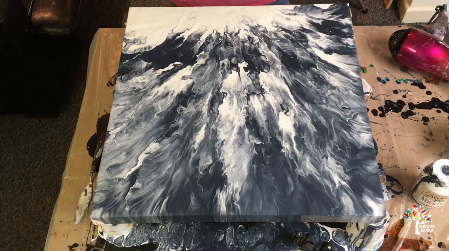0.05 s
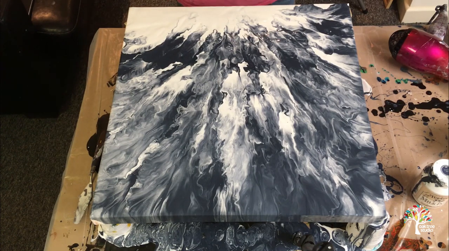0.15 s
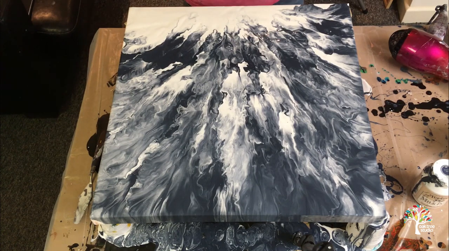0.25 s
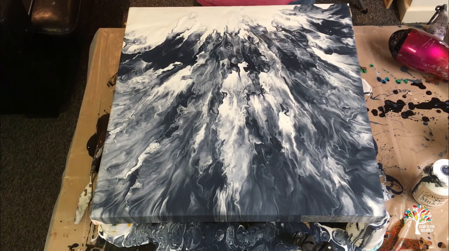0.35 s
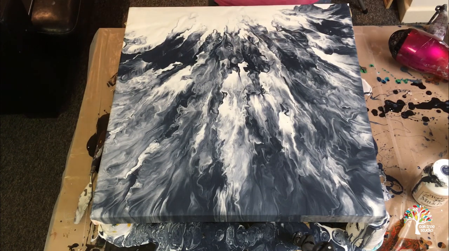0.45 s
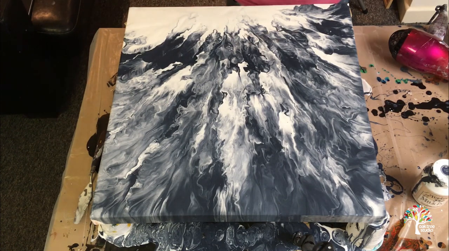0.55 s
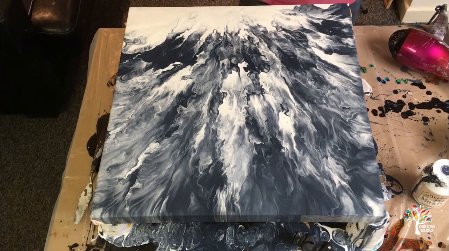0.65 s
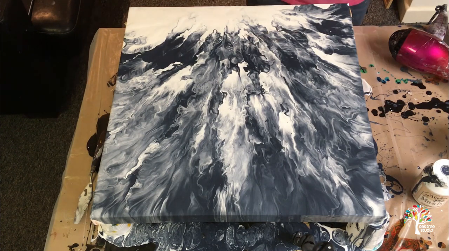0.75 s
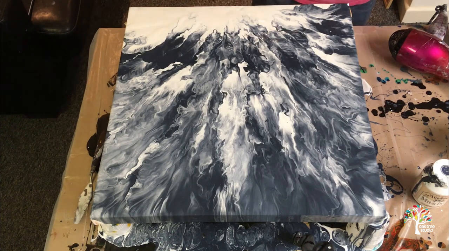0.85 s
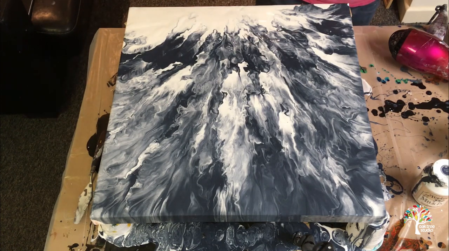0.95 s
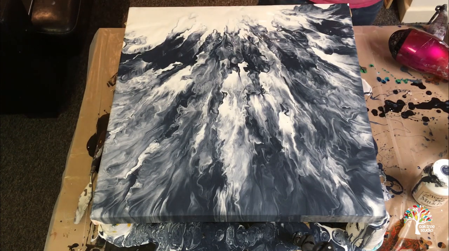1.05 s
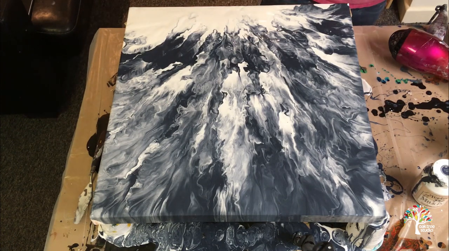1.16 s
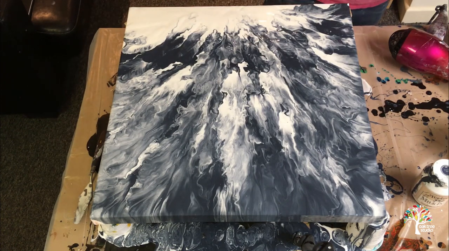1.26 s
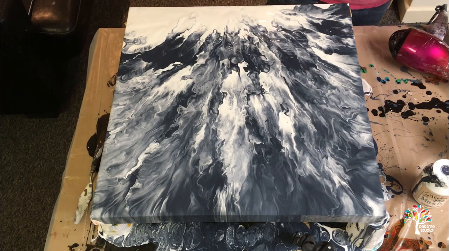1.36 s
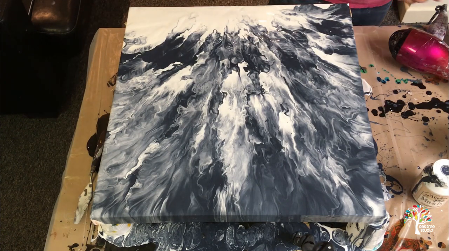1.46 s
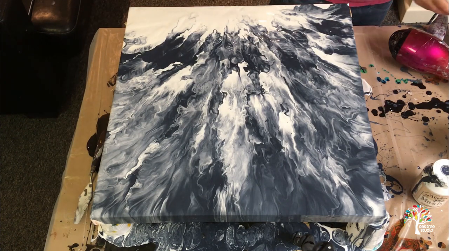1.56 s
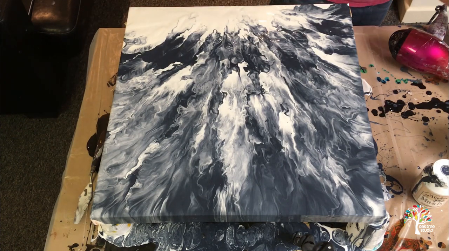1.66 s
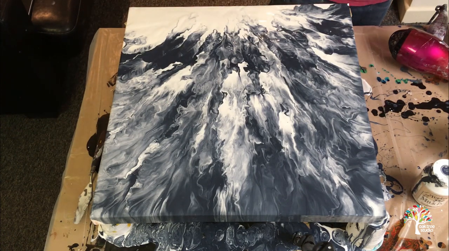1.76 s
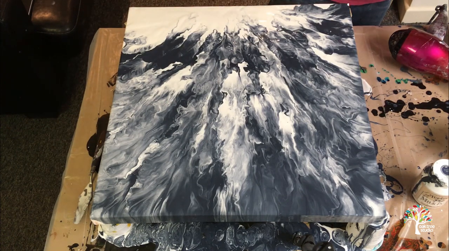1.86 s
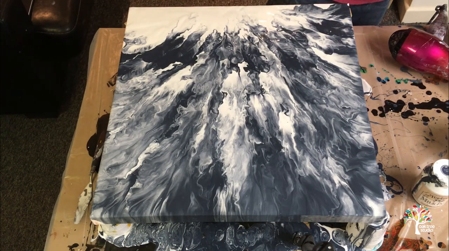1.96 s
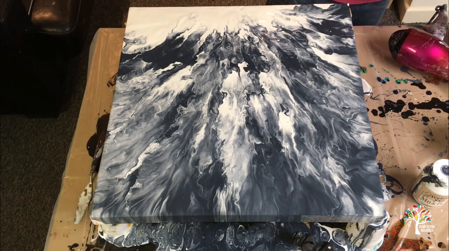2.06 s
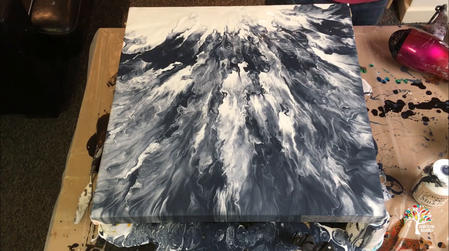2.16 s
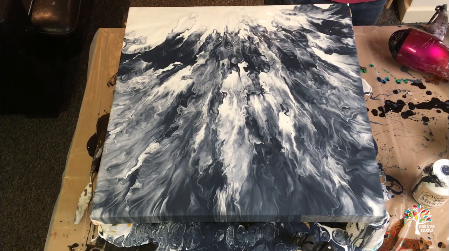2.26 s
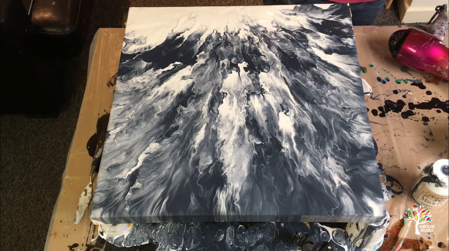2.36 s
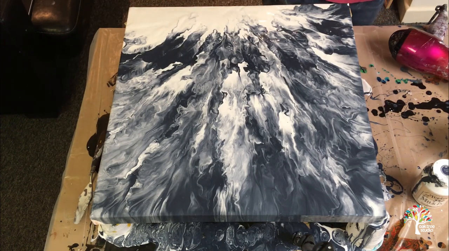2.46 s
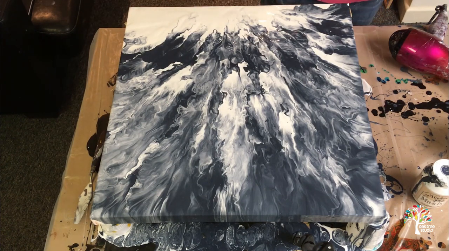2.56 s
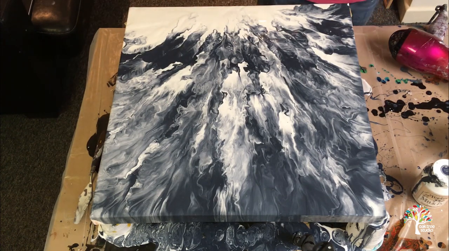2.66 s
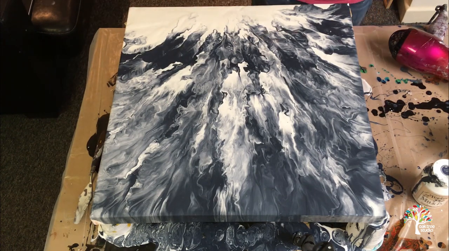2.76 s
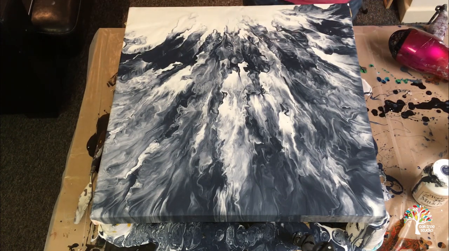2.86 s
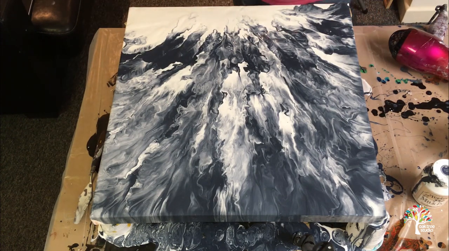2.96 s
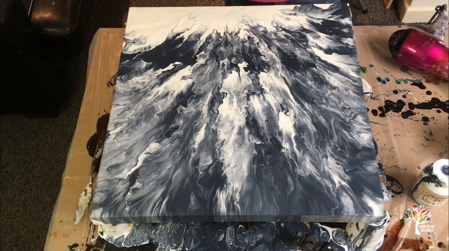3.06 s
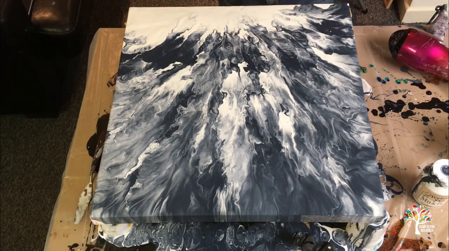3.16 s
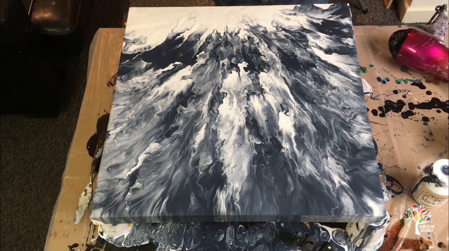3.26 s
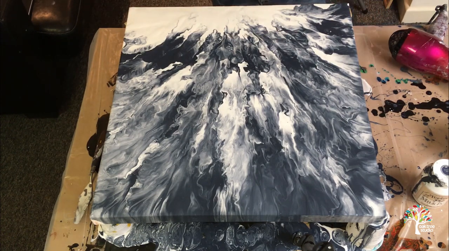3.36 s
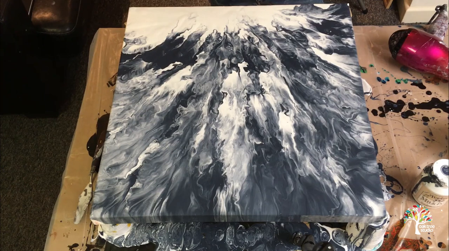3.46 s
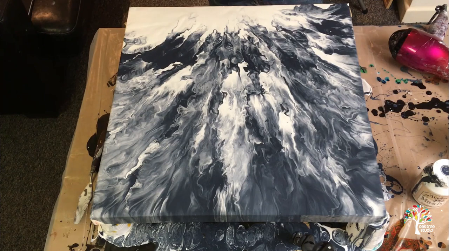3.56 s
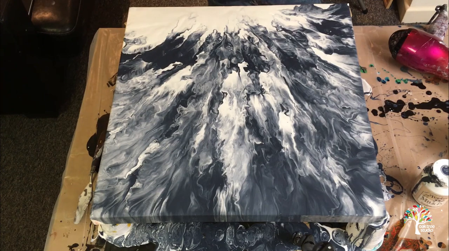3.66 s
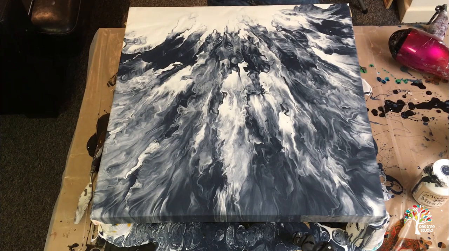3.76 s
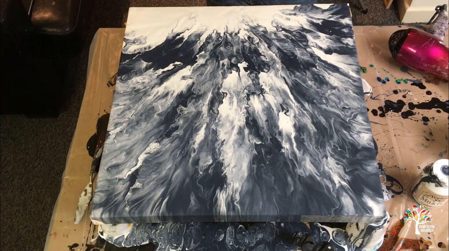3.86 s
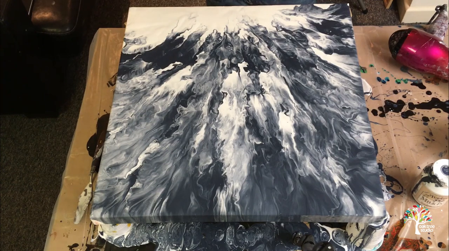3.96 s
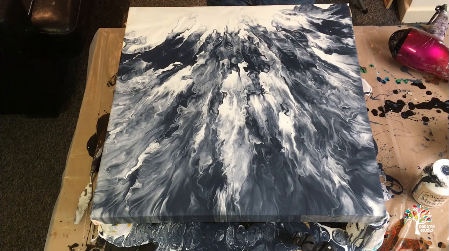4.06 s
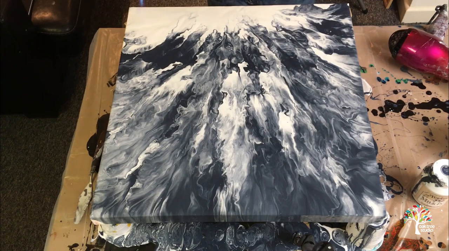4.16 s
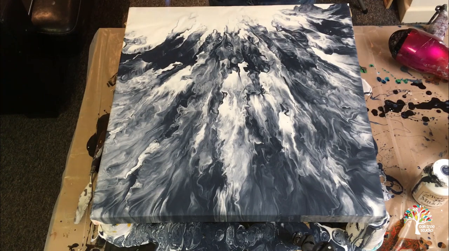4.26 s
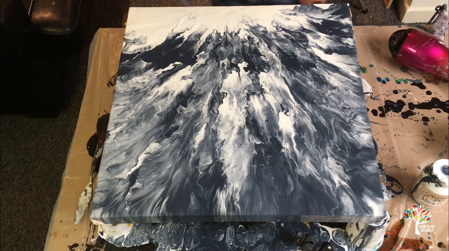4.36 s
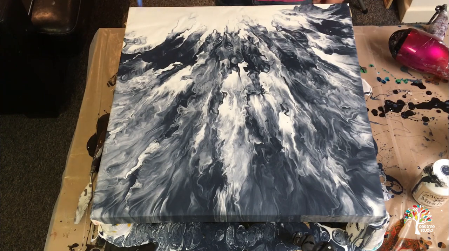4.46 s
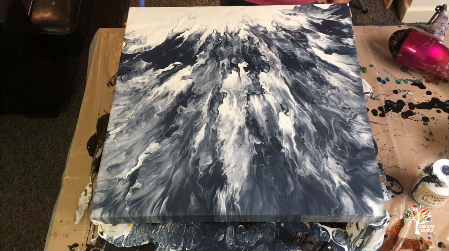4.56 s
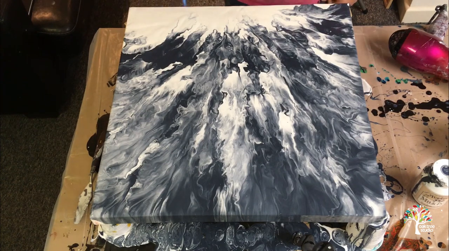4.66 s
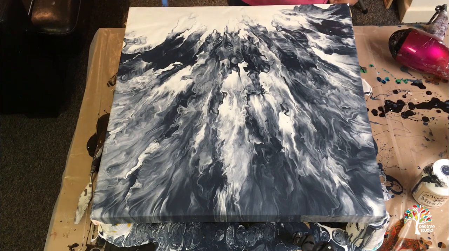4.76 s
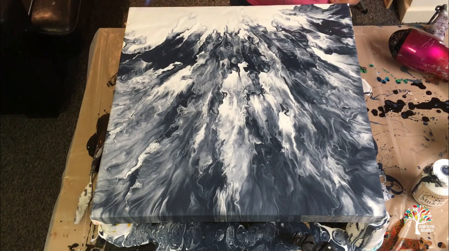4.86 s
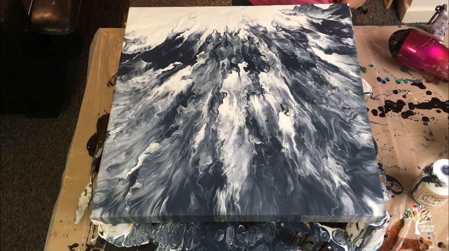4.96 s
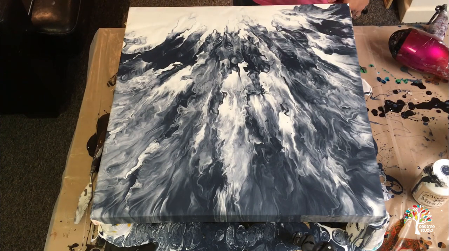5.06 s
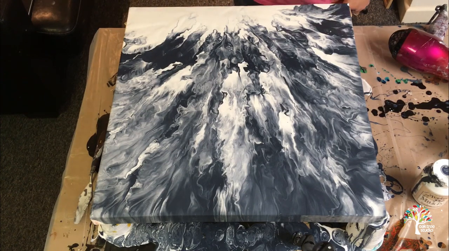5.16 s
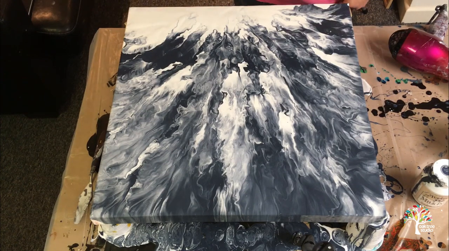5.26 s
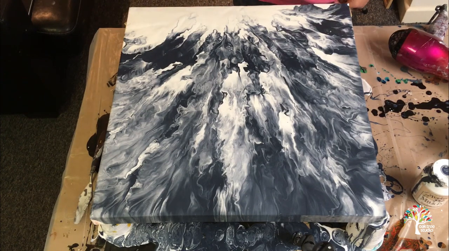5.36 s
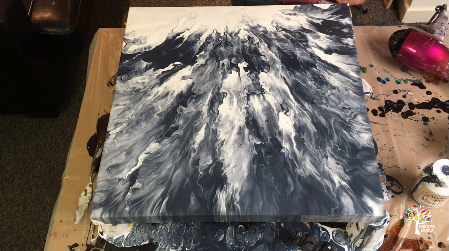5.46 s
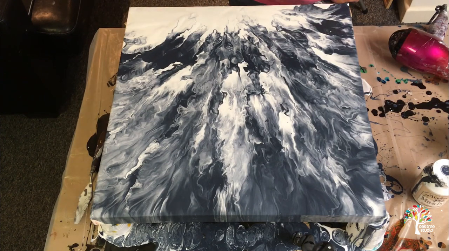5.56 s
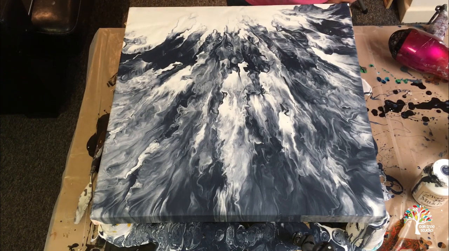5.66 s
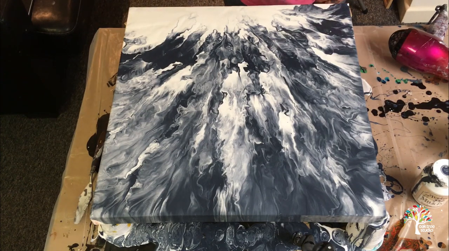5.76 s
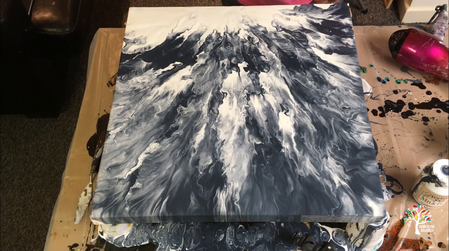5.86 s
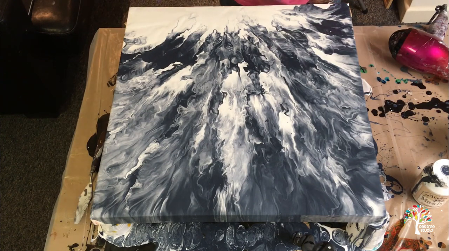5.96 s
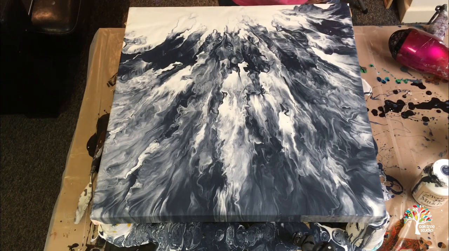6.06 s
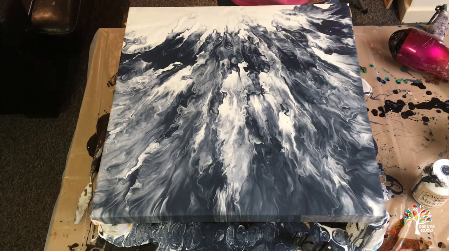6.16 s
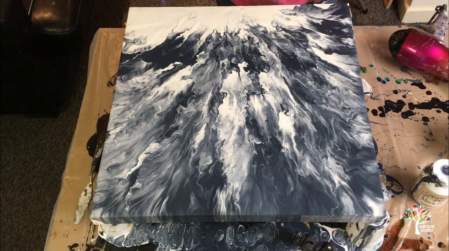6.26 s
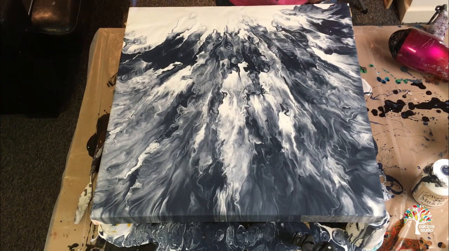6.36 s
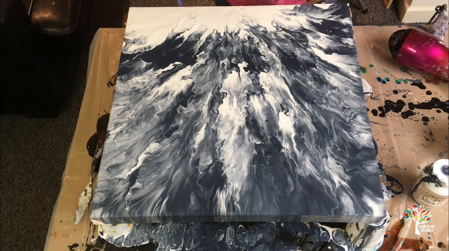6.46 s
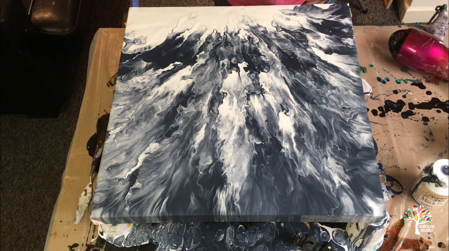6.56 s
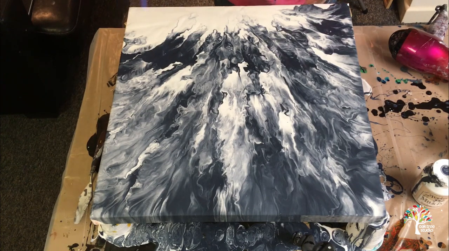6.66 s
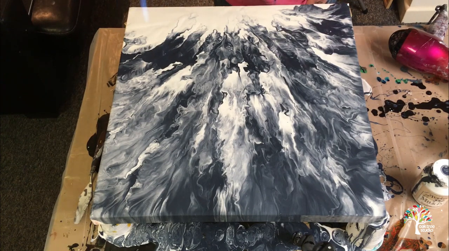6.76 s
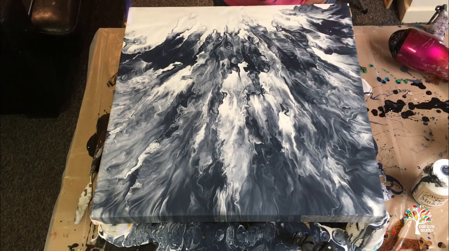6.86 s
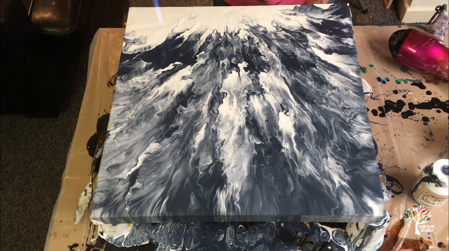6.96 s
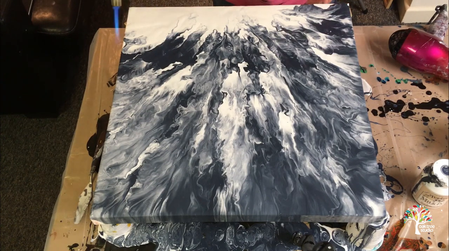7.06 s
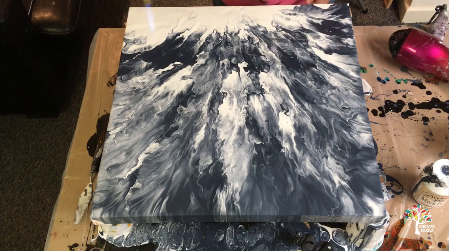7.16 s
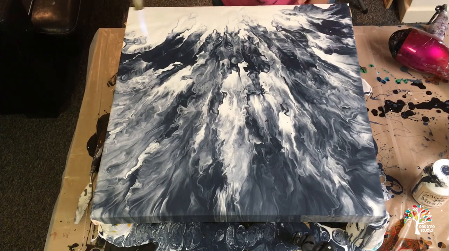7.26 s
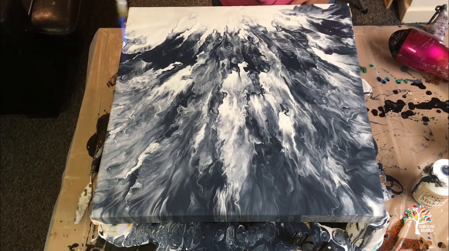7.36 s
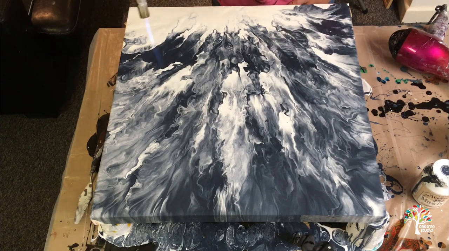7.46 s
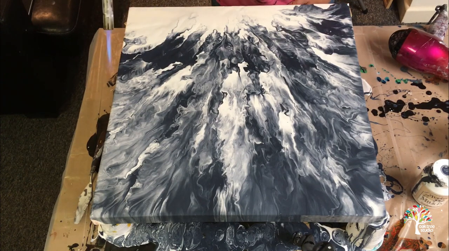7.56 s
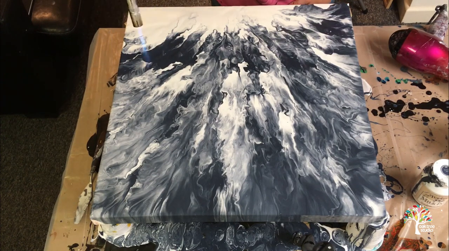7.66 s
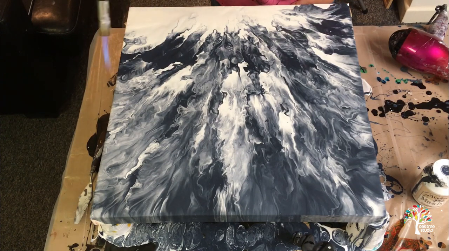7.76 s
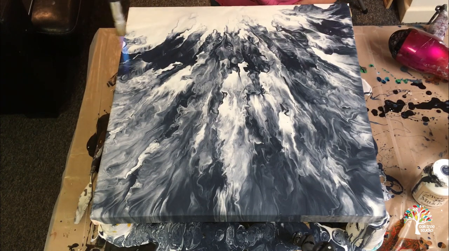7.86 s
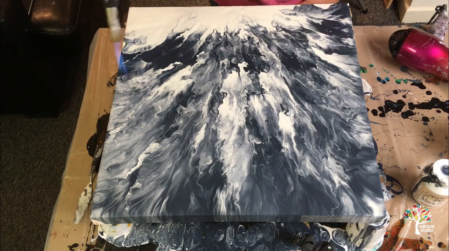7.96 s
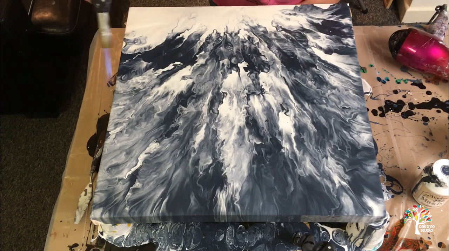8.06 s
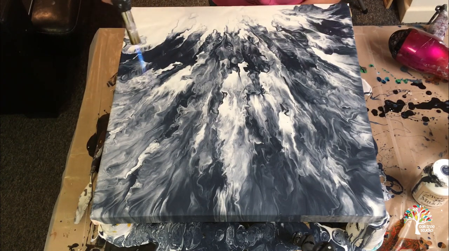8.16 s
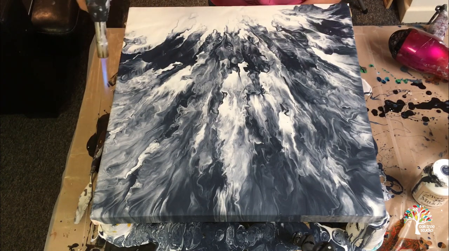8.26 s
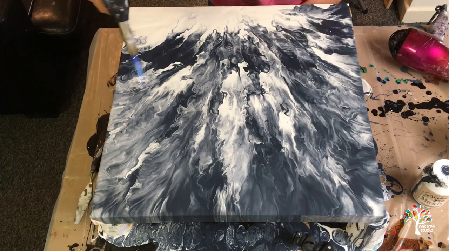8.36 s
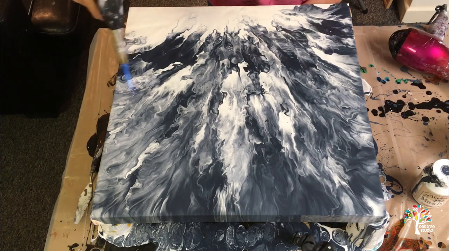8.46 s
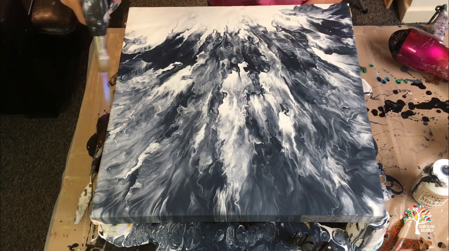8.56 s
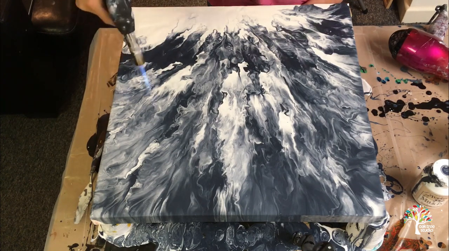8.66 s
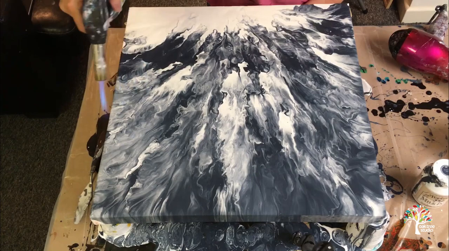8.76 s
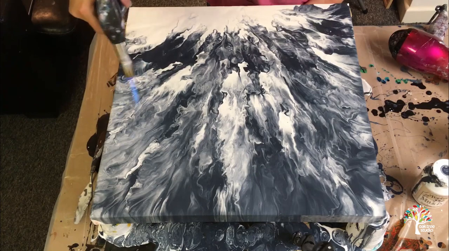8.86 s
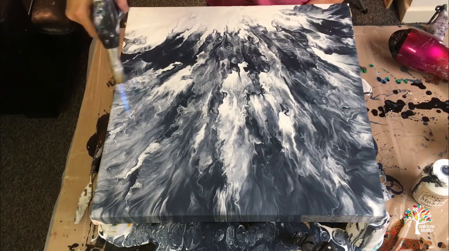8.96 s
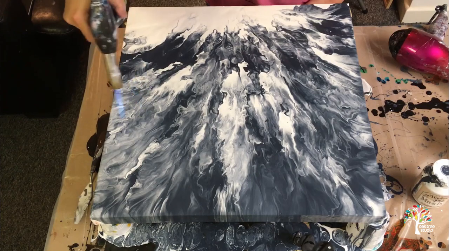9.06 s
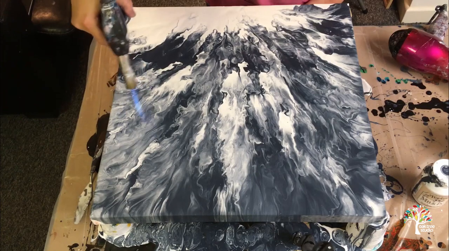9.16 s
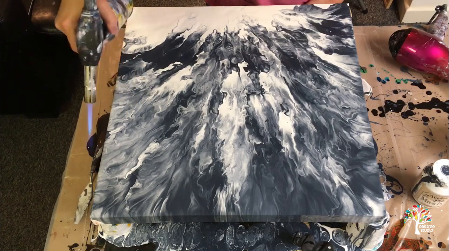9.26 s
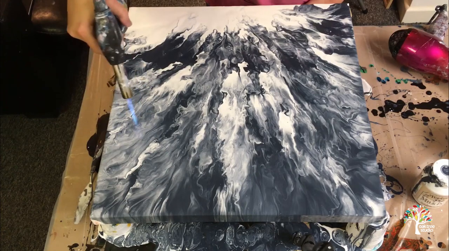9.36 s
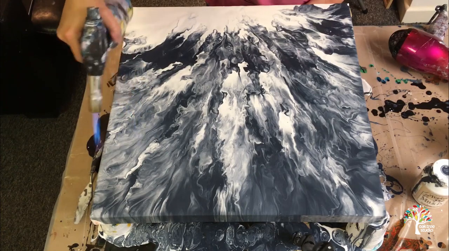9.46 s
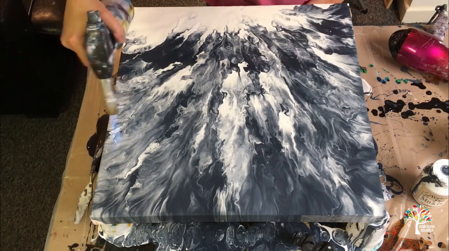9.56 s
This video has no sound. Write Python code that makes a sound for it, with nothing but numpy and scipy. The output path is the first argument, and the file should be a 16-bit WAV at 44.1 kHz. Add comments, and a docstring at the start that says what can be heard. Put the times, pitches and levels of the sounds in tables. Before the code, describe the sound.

A low ventilation hum fills a small room while a hand makes faint clicks, knocks and rubs on a butane torch. The valve opens with a thin hiss, the igniter snaps sharply and the gas catches with a low pop. The flame then roars under a high hiss, flaring several times a second, and grows boomier and duller as it comes nearer the microphone.

```python
"""Butane torch over a table

A ventilation hum fills a small room while a hand clicks, knocks and slides on the torch.
The valve opens with a thin nozzle hiss, the igniter snaps and the gas catches with a low pop.
The turbulent flame roars under the hiss of its jet and flares several times a second as it is
waved about. It turns boomier and duller as it comes nearer over the table."""
import sys
import numpy as np
from scipy import signal
from scipy.fft import rfft, irfft, next_fast_len
from scipy.io import wavfile

SR = 44100
rng = np.random.default_rng(int(sys.argv[2]) if len(sys.argv) > 2 else 0)


def unload_wav(signal):
    """Save mono or channel-first audio to the path in sys.argv[1] as 16-bit WAV at rate SR, clipped to [-1, 1]."""
    wavfile.write(
        sys.argv[1],
        SR,
        np.round(np.clip(np.atleast_2d(signal).T, -1, 1) * 32767).astype(np.int16),
    )


N = 424683
TIME = np.arange(N) / SR
CATCH_S, CATCH_RISE_S = 4.076, 0.01  # the flame takes over from the cold hiss
NEAR_S, APPROACH_S = 5.5, 2.2  # the torch is brought nearer over the table


def amp(db):
    """Decibels to gain."""
    return 10 ** (np.asarray(db) / 20)


def unit(x):
    """Scales to rms 1."""
    return x / np.sqrt(np.mean(x ** 2) + 1e-20)


def add(mix, s, sound):
    """Mixes a sound in at time s."""
    part = mix[max(round(s * SR), 0):][:len(sound)]
    part += sound[:len(part)]


def ramp(start, length):
    """Linear fade from 0 to 1 that stays up."""
    return np.clip((TIME - start) / length, 0, 1)


def decay(t, t60):
    """Falls by 60 dB in t60."""
    return np.exp(-np.log(1000) * np.maximum(t, 0) / t60)


def burst(t, length, rise, t60):
    """Attack, hold until length, release."""
    return (1 - decay(t, rise)) * decay(t - length, t60)


def drift(rate_hz):
    """Random modulator of rms 1, moving at up to the given rate."""
    spectrum = rfft(rng.standard_normal(N // 32))
    hz = np.arange(len(spectrum)) * SR / N
    slow = irfft(spectrum / (1 + (hz / rate_hz) ** 4))
    return unit(np.interp(np.linspace(0, 1, N), np.linspace(0, 1, len(slow)), slow))


def along(points, hz):
    """Reads a table on a log-frequency axis."""
    f, value = np.transpose(points)
    return np.interp(np.log(hz + 1), np.log(f + 1), value)


def resonances(peaks, hz):
    """Summed dB of bell-shaped peaks and dips."""
    return sum(db / (1 + (2 * (hz - centre) / width) ** 2) for centre, width, db in peaks)


def noise(colour, peaks=(), size=N, tilt=0, grains_per_s=SR):
    """Noise of rms 1 with an EQ curve, peaks and a tilt in dB/octave; few grains make it crackle."""
    full = next_fast_len(size)
    hz = np.fft.rfftfreq(full, 1 / SR)
    db = along(colour, hz) + tilt * np.log2(hz + 1) + resonances(peaks, hz)
    grains = rng.standard_normal(full) * (rng.random(full) < grains_per_s / SR)
    return unit(irfft(rfft(grains) * amp(db), full)[:size])


def band(centre_hz, width_hz):
    """Noise of rms 1 ringing in one resonance, steady or gliding."""
    size = next_fast_len(N)
    hz = np.fft.fftfreq(size, 1 / SR)
    white = rng.standard_normal(2 * size).view(complex)
    fuzz = np.fft.ifft(white / (1 + (2 * hz / width_hz) ** 2))[:N]
    phase = 2 * np.pi * np.cumsum(centre_hz * np.ones(N)) / SR
    return unit(fuzz.real * np.cos(phase) - fuzz.imag * np.sin(phase))


# Reverb time of the small room (f/Hz, t60/s)
ROOM_DECAY = [(200, 0.41), (1300, 0.26), (3500, 0.38), (9000, 0.29), (16000, 0.42)]
def room(x, wet_db):
    """Direct sound plus a short tail of sparse reflections; the power is kept."""
    size, taps_per_s, predelay_s = SR // 2, 3000, .003
    taps = rng.choice([-1, 1], size) * (rng.random(size) < taps_per_s / SR)
    hz, t, spectra = signal.stft(taps * (TIME[:size] > predelay_s), SR, nperseg=256)
    fade = 1000. ** (-t / along(ROOM_DECAY, hz)[:, None])
    tail = signal.istft(spectra * fade, SR, nperseg=256)[1]
    wet = signal.fftconvolve(x, tail / np.linalg.norm(tail))[:N]
    return (x + amp(wet_db) * wet) / np.hypot(1, amp(wet_db))


def moving_room(x, wet_db, cycle_s=2.3):
    """Three reverbs crossfade: the reflections change as the torch is waved about."""
    phases = 2 * np.pi * (TIME / cycle_s + np.arange(3)[:, None] / 3)
    return sum(room(x, wet_db) * (1 + np.cos(phase)) / 3 for phase in phases)


def near_echoes(x, count=4, sway_ms=.22):
    """Reflections off nearby things slide as the hand moves and make the hiss shimmer."""
    lags_ms = [lag + sway_ms * drift(rate_hz=1.5) for lag in rng.uniform(1.2, 6, count)]
    late = sum(np.interp(TIME - lag / 1000, TIME, x) for lag in lags_ms) / np.sqrt(count)
    return np.std(x) * unit(x + amp(-3) * late)


# EQ of the room tone (f/Hz, level/dB)
RUMBLE_EQ = [(24, -42), (37, -8), (60, 1.5), (90, -1.5), (115, 6), (165, 1), (185, -5), (240, -10.5),
             (420, -20.5), (1000, -26.5), (2200, -36.5), (5000, -40.5), (12000, -39.5), (16000, -38)]
# Fan tones (f/Hz, level/dB, wander/Hz)
FAN_TONES = [(99.9, -55.5, 0.87), (119.5, -58, 2.345), (160.3, -59, 2.7), (191, -67.5, 3.26)]
def ventilation():
    """A bed of low rumble with a few wandering fan tones."""
    unsteady = amp(.6 * drift(rate_hz=9))
    out = amp(-50) * noise(RUMBLE_EQ) * unsteady
    for hz, db, wander in FAN_TONES:
        pitch = hz + wander * drift(rate_hz=5.5)
        out += amp(db) * np.sqrt(2) * np.sin(2 * np.pi * np.cumsum(pitch) / SR)
    return out


# EQ of skin on the torch (f/Hz, level/dB)
SLIDE_EQ = [(500, -22), (1500, -5), (2000, -6), (2600, 1.5), (3300, -6), (5000, -5.5), (6100, 1.5),
            (7300, -7.5), (10000, -1.5), (12500, -0.5), (15000, -4.5)]
# The torch slips in the hand (t/s, length/s, relative level/dB, tilt/dB per octave)
SLIDE_CUES = [(0, 0.17, -60.5, -1.5), (1.074, 0.057, -59, 2), (1.104, .02, -55, 7), (1.358, 0.27, -70, -5),
              (2.013, 0.12, -65, 3), (2.48, 0.0092, -44, 9), (2.5, .025, -61, 3), (2.552, .03, -55.5, 5.5),
              (2.613, 0.027, -59.5, 3)]
def slides():
    """Skin rubs unevenly along the torch."""
    out, t = np.zeros(N), TIME[:SR // 2]
    for s, length, db, brightness in SLIDE_CUES:
        rub = noise(SLIDE_EQ, size=len(t), tilt=brightness)
        add(out, s, amp(db) * rub * burst(t, length, rise=0.008, t60=0.12))
    return out * amp(2.5 * drift(rate_hz=87))


# Ring of the torch body, also struck by the igniter (f/Hz, width/Hz, level/dB)
BODY_MODES = [(1660, 220, 11), (3380, 450, 12), (4340, 200, 4), (6180, 120, 15), (6800, 170, 10.5),
              (9800, 430, 5), (14700, 500, -4)]
def contacts(cues, octaves, rise, t60, ring_share):
    """Each touch is a noise burst around its centre frequency, coloured by the torch body."""
    out, t = np.zeros(N), TIME[:SR // 4]
    hz = np.geomspace(40, 20000, 400)
    ring = [(f, width, ring_share * db) for f, width, db in BODY_MODES]
    for s, db, centre in cues:
        bell_db = -15 * np.log1p((np.log2(hz / centre) / octaves) ** 2 / 2)
        hit = noise(np.column_stack([hz, bell_db]), ring, size=len(t))
        add(out, s, amp(db) * hit * burst(t, 0, rise, t60))
    return out


# Hard clicks of trigger and valve (t/s, level/dB, f/Hz)
CLICK_CUES = [(.234, -50, 3500), (1.109, -40, 4500), (1.168, -45, 12000), (2.011, -51, 12000),
              (2.039, -52, 14000), (2.079, -40.5, 11000), (2.095, -53, 3500), (2.482, -40, 16000),
              (2.706, -46, 14000), (3.202, -33, 3580), (3.791, -27, 7000)]
# Pitched tinks of small parts (t/s, level/dB, f/Hz)
TINK_CUES = [(.234, -57, 3250), (1.109, -48, 2500), (1.112, -51, 3440), (1.353, -64, 3150),
             (2.08, -56, 1500), (2.485, -60, 2500), (2.5, -59, 3450), (2.666, -51, 1220),
             (2.699, -65, 1270), (3.791, -48, 1140)]
# Soft knocks of the hand (t/s, relative level/dB, f/Hz)
KNOCK_CUES = [(.385, -59, 800), (.429, -47.5, 1010), (.44, -50.5, 1350), (.445, -48.5, 2200),
              (.615, -62, 1500), (.877, -64, 1100), (1.109, -50, 480), (1.354, -64, 1900),
              (1.392, -59, 1100), (1.587, -58, 1200), (1.71, -59, 960), (1.849, -53, 288),
              (2.285, -62, 1000), (2.325, -56.5, 750), (2.537, -54.5, 930)]
def handling():
    """Hand foley: hard parts hit fast and bright, skin lands slow and dull."""
    clicks = contacts(CLICK_CUES, octaves=3.4, rise=0.001, t60=0.013, ring_share=0.15)
    tinks = contacts(TINK_CUES, octaves=.085, rise=0.001, t60=.06, ring_share=.1)
    knocks = contacts(KNOCK_CUES, octaves=0.69, rise=0.024, t60=0.092, ring_share=0.065)
    hard = room(clicks, wet_db=-0.5) + room(tinks, wet_db=-2)
    return hard + amp(1) * room(amp(3.5) * knocks + slides(), wet_db=-0.5)


def whistles(peaks, swell_db, rate_hz, bend_share=.005):
    """Each resonance swells and fades by itself; all bend together with the gas flow."""
    bend = 1 + bend_share * drift(rate_hz)
    voices = (amp(db + swell_db * drift(rate_hz)) * band(hz * bend, width) for hz, width, db in peaks)
    return unit(sum(voices))


# Pitch curve of the nozzle's top whistle (t/s, f/Hz)
WHISTLE_GLIDE = [(3.42, 14750), (3.54, 13950), (3.76, 13850), (4.03, 14400)]
def sliding_whistles(width_hz=650):
    """A breathy whistle sags as the valve opens, then climbs; a lower one joins at full flow."""
    hz = np.interp(TIME, *np.transpose(WHISTLE_GLIDE))
    lower = amp(-7) * ramp(start=3.88, length=.1) * band(.853 * hz, width_hz)
    return amp(-7.5) * band(hz, width_hz) + lower


# EQ of the unlit gas (f/Hz, level/dB)
GAS_EQ = [(500, -36), (1100, -2.5), (1600, -7.5), (2300, -9.5), (3500, -0.5), (4500, -7), (5000, -20),
          (6000, 5), (7600, -3.5), (9600, 5.5), (10400, 1), (11400, 6.5), (13000, -2), (15700, 7.5)]
# Nozzle resonances (f/Hz, width/Hz, level/dB)
NOZZLE_MODES = [(2770, 390, -8), (4500, 420, -8), (5780, 450, -1), (6460, 600, -0.5), (8770, 900, -2.5),
                (13900, 1100, -1)]
def cold_gas():
    """Gas hisses and whistles faintly through the nozzle from the valve opening until it catches."""
    hiss = amp(-1) * noise(GAS_EQ)
    whistle = amp(-7) * whistles(NOZZLE_MODES, swell_db=2.5, rate_hz=3.5) + sliding_whistles()
    flow = ramp(start=3.265, length=0.14) * (1 - ramp(CATCH_S, CATCH_RISE_S))
    return room(near_echoes(amp(-47.5) * flow * (hiss + whistle)), wet_db=-14.5)


# EQ of the sharp snap (f/Hz, level/dB)
SNAP_EQ = [(200, -55), (1500, -7.5), (4000, -3), (7000, -3), (10000, 6.5), (15000, 1), (16500, -22)]
# EQ of the ringing clack after it (f/Hz, level/dB)
CLACK_EQ = [(40, 6), (150, -2), (330, -22), (900, -2), (2400, -5), (4500, -1.5), (8000, -1), (14000, 1),
            (15700, -2), (16500, -16)]
def igniter(pop_hz=95):
    """The striker snaps and rebounds, the body rings on, and the gas catches with a low pop."""
    out, t = np.zeros(N), TIME[:SR // 2]
    snap = np.tanh(.5 * noise(SNAP_EQ, size=SR // 500))
    add(out, 4.0459, amp(-3.5) * (snap - snap.mean()))
    ring_out = amp(-19) * decay(t, t60=.18) + amp(-42) * decay(t, t60=.02)
    add(out, 4.0757, noise(CLACK_EQ, BODY_MODES, size=len(t)) * ring_out)
    rebound = noise(CLACK_EQ, BODY_MODES, size=len(t)) * decay(t, t60=0.03)
    add(out, 4.0815, amp(-28) * rebound)
    swell = t / 0.0051
    pop = swell * np.exp(1 - swell) * np.sin(2 * np.pi * pop_hz * t)
    add(out, 4.079, amp(-24.5) * pop)
    return signal.sosfilt(signal.butter(3, 65, "high", fs=SR, output="sos"), out)


def freshness(settle_s):
    """1 when the gas catches, easing to 0 as the flame settles."""
    return np.exp(-np.maximum(TIME - CATCH_S, 0) / settle_s)


# EQ of the burning jet (f/Hz, level/dB)
JET_EQ = [(1000, -22), (3000, 5), (4300, -0.5), (4900, 0.5), (5300, 3.5), (7300, -1), (9800, -1),
          (10400, 6), (11200, 4.5), (13400, -21), (15700, 1)]
# Burner tube resonances (f/Hz, width/Hz, level/dB)
BURNER_MODES = [(5900, 420, -2), (8590, 1000, 3.5), (9630, 530, -0.5), (12400, 1700, 4.5),
                (14400, 800, 5.5)]
def jet(duck):
    """The jet hisses harder while the flame is fresh; the tube's whistle grows as it comes nearer."""
    near = ramp(NEAR_S, APPROACH_S)
    whistle = amp(-52.5 + 1.5 * near) * whistles(BURNER_MODES, swell_db=2.1, rate_hz=4.4)
    hiss = amp(-55 + 5.5 * freshness(settle_s=0.85)) * noise(JET_EQ)
    return hiss + whistle * duck ** 0.68


# EQ of the steady combustion (f/Hz, level/dB)
ROAR_EQ = [(40, -53), (90, 6), (170, 7), (215, 2.5), (300, 0.5), (550, 1), (900, 1.5), (1150, -0.5),
           (1600, -7.5), (2200, -11.5), (3300, -16.5), (4500, -24.5), (8000, -46), (16000, -47)]
# Room resonances near the flame, also heard in the flares (f/Hz, width/Hz, level/dB)
ROOM_MODES = [(159, 5.6, 1), (332, 13, 3), (410, 12, 4), (461, 13, 4.5), (655, 28, 2.5)]
def roar():
    """Turbulent combustion: hollow when fresh, booming over the table."""
    hollow = amp(-43.5) * freshness(settle_s=0.88) * band(centre_hz=591, width_hz=320)
    boom = amp(-50) * ramp(NEAR_S, length=.2) * band(centre_hz=150.2, width_hz=106)
    steady = amp(-39.5 - 0.2 * freshness(settle_s=0.85)) * noise(ROAR_EQ, ROOM_MODES)
    return steady + hollow + boom


# EQ of a flare (f/Hz, level/dB)
FLARE_EQ = [(60, -62), (150, 9), (300, 0.5), (550, 3.5), (950, 4), (1600, -5.5), (2200, -8.5), (3400, -11),
            (4500, -14), (7000, -18.5), (10000, -17.5), (15700, -22.5)]
# The flame tears in the moving air (t/s, length/s, relative level/dB)
FLARE_CUES = [(4.39, 0.056, -40.5), (4.554, 0.092, -35), (4.715, .06, -43.5), (4.878, 0.04, -36),
              (4.941, 0.054, -35), (5.113, 0.05, -36), (5.255, 0.066, -35.5), (5.436, 0.047, -36),
              (5.483, 0.058, -36), (5.621, 0.049, -34.5), (5.786, 0.042, -37.5), (5.923, 0.036, -39),
              (6.063, 0.034, -41), (6.165, 0.031, -34.5), (6.386, 0.051, -34.5), (6.529, 0.057, -36),
              (6.626, 0.065, -33), (6.747, 0.076, -42.5), (6.863, .06, -35), (6.998, 0.041, -38),
              (7.102, 0.065, -37), (7.271, 0.028, -40), (7.388, 0.023, -37), (7.489, 0.043, -36),
              (7.613, 0.049, -40), (7.717, 0.048, -37.5), (7.95, 0.039, -38), (8.071, 0.034, -34.5),
              (8.205, 0.053, -43), (8.346, 0.029, -38.5), (8.467, 0.047, -39.5), (8.594, 0.04, -34.5),
              (8.704, 0.072, -39), (8.839, 0.038, -37.5), (9.09, 0.027, -39.5), (9.188, 0.057, -36.5),
              (9.33, 0.022, -33.5), (9.442, 0.043, -40.5), (9.551, 0.027, -34)]
# The flame spits sharply (t/s, relative level/dB)
SPIT_CUES = [(5.924, -27), (8.347, -23.5), (8.473, -29), (8.598, -25)]
def flares(typical_db=-37):
    """Gusts tear the flame into sputtering roar; louder flares are brighter, shorter ones snappier."""
    out, t = np.zeros(N), TIME[:SR // 3]
    for s, length, db in FLARE_CUES:
        brightness = .4 + 0.23 * (db - typical_db)
        swell = burst(t, length, rise=0.44 * length, t60=0.049)
        rush = noise(FLARE_EQ, ROOM_MODES, size=len(t), tilt=brightness)
        sputter = noise(FLARE_EQ, ROOM_MODES, size=len(t), tilt=brightness - .6, grains_per_s=1100)
        add(out, s, amp(db) * swell * unit(rush + amp(-4) * sputter))
    for s, db in SPIT_CUES:
        add(out, s, amp(db) * decay(t, t60=0.015) * noise(FLARE_EQ, size=len(t), tilt=0.22))
    return out * amp(2.1 * drift(rate_hz=300))


def lulls(lead_s, depth_db):
    """The level ducks just before each flare, as moving air stretches the flame thin."""
    dips = sum(np.exp(-((TIME - s + lead_s) / (0.28 * lead_s)) ** 2) for s, *_ in FLARE_CUES)
    return amp(-depth_db * dips)


# Sweep of the flame's two broad resonances (t/s, lower f/Hz, upper f/Hz)
FLAME_SWEEP = [(4.3, 580, 880), (5.0, 560, 930), (5.7, 560, 1010), (6.5, 576, 940), (7.0, 474, 815),
               (7.7, 424, 800), (8.7, 384, 820), (9.6, 380, 830)]
def over_table(x):
    """Two resonances slide as the torch moves over the table; up close the upper mids dull."""
    hz, t, spectra = signal.stft(x, SR, nperseg=1024)
    when, lower, upper = np.transpose(FLAME_SWEEP)
    near = np.interp(t, TIME, ramp(NEAR_S, APPROACH_S))
    bells = [(np.interp(t, when, lower), 110, 3.5),  # f/Hz, width/Hz, level/dB
             (np.interp(t, when, upper), 170, 4),
             (1700, 600, -2.5 * near)]
    return signal.istft(spectra * amp(resonances(bells, hz[:, None])), SR, nperseg=1024)[1][:N]


def flame():
    """The lit torch: one flutter shakes both roar and jet, and the flares ride on top."""
    flutter, duck = drift(rate_hz=10), lulls(lead_s=0.047, depth_db=1.5)
    lit = ramp(CATCH_S, CATCH_RISE_S)
    burn = roar() * lit * amp(-2 + 1.25 * flutter) * duck
    grain = amp(1.1 * drift(rate_hz=310))
    hiss = jet(duck) * lit * amp(0.26 * flutter) * duck ** 0.38
    fire = over_table(burn * grain + amp(-1.7) * flares())
    return moving_room(fire, wet_db=-1.5) + room(near_echoes(hiss), wet_db=-7.5)


def scene():
    """Room tone, hand foley and torch in one mono mix."""
    return (ventilation() + handling() + cold_gas() + igniter() + flame())[None]


# Dips in the microphone's response (f/Hz, width/Hz, level/dB)
MIC_EQ = [(4860, 340, -1), (10540, 560, -5.5)]
def record(dry):
    """Microphone colour, an instant of silence after the snap, then a steep low-pass."""
    mute_from_s, mute_to_s, cutoff_hz = 4.048, 4.0755, 15850
    size = next_fast_len(N)
    response = amp(resonances(MIC_EQ, np.fft.rfftfreq(size, 1 / SR)))
    heard = irfft(rfft(dry, size) * response, size)[:, :N]
    live = (TIME < mute_from_s) | (TIME > mute_to_s)
    lowpass = signal.firwin(801, cutoff_hz, window=("kaiser", 9), fs=SR)
    return signal.oaconvolve(heard * live, lowpass[None], "same")


dry = scene()
out = record(dry)
unload_wav(out)
```